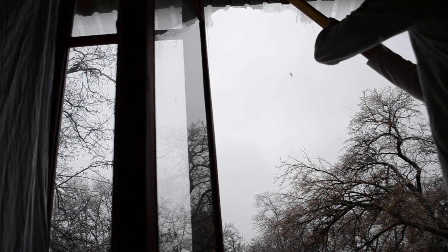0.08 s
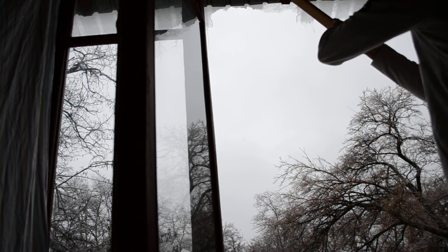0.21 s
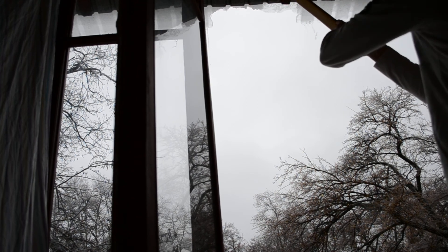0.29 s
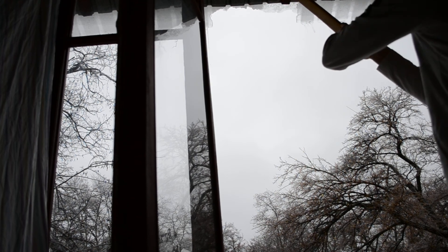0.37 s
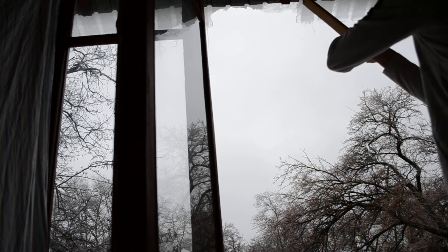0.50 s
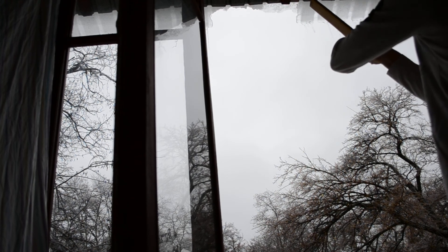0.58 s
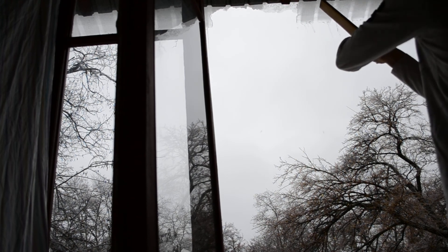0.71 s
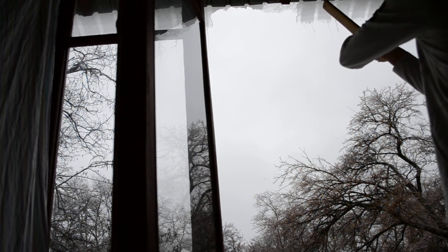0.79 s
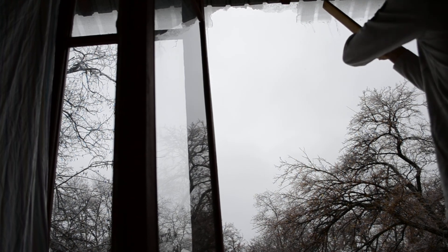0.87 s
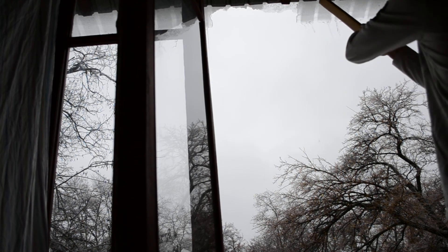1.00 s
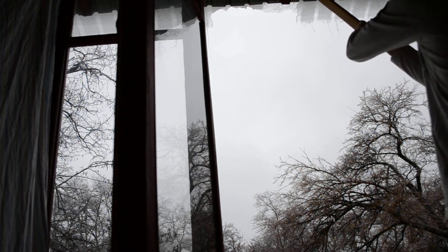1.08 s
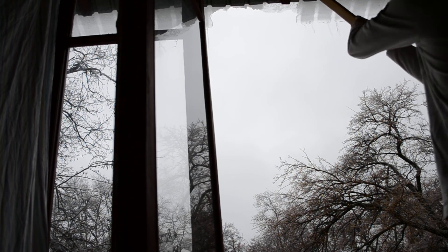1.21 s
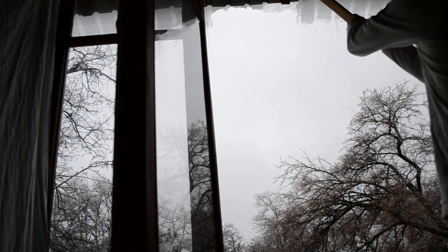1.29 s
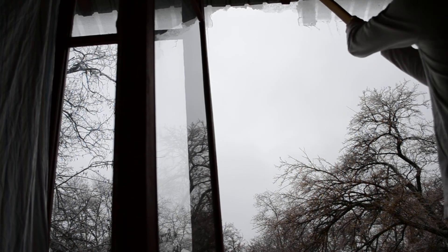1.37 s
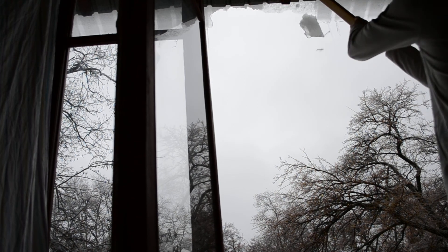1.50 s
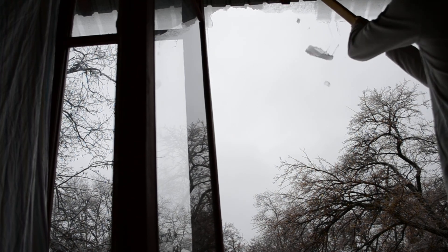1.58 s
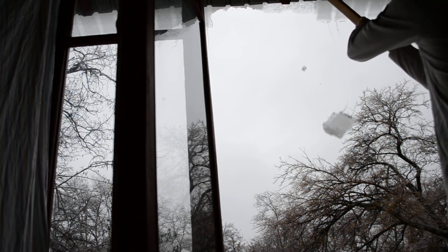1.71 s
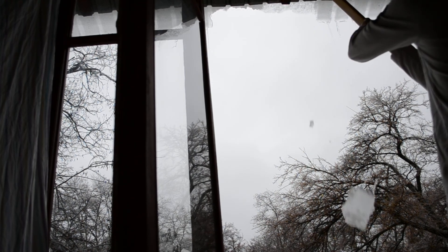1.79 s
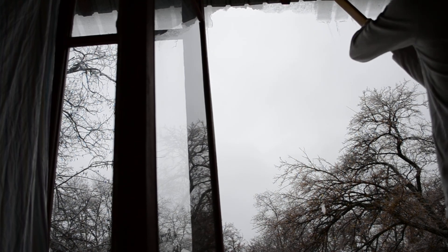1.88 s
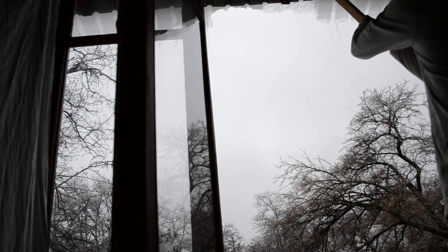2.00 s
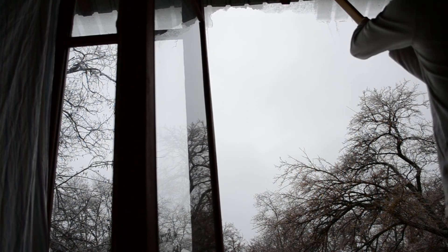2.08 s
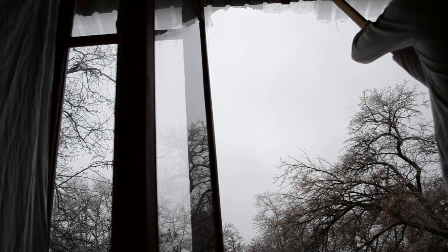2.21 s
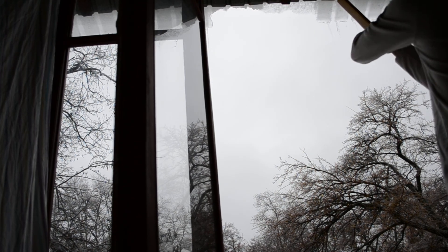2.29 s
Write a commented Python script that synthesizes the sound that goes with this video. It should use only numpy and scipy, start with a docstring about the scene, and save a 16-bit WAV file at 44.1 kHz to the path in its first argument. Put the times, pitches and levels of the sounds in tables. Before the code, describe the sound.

Ice knocked off an eave: sharp shard clicks and a loud lump thud on the sill open, crumbs patter and ice crunches, then softer stick knocks and an icicle snap, close microphone at an open window.

```python
"""Icicles knocked off an eave

A wooden stick, reached out of an open window, knocks on the iced eave, whose modes ring at each blow.
Ice crunches in runs of tiny clicks, an icicle chatters and snaps, and a lump thuds on the ringing sill.
Shards click close by as short rings and noise snaps; crumbs shower down as random clicks and hiss.
Sliding snow, bumping and outdoor air are coloured noise; a tail of noise bands is the room behind."""
import sys
import numpy as np
from scipy import signal
from scipy.fft import rfft, irfft
from scipy.io import wavfile

SR = 44100
rng = np.random.default_rng(int(sys.argv[2]) if len(sys.argv) > 2 else 0)


def put_to_file(sound):
    """Save the sound as 16-bit audio at rate SR, in the file named by the first command-line argument."""
    columns = np.atleast_2d(sound).T  # one column per channel
    safe = np.clip(columns, -1, 1)
    whole_steps = np.round(safe * 32767)
    wavfile.write(sys.argv[1], SR, whole_steps.astype(np.int16))


N = 101430  # 2.3 s
TIME = np.arange(N) / SR
RING_TIME = TIME[:SR // 2]  # half a second for each single sound

# stick strikes the iced eave: t/s, level/dB, treble limit f/Hz, bass limit f/Hz
KNOCKS = [(1.2248, -27, 7800, 150), (1.234, -29.5, 2200, 295), (1.286, -36.5, 2100, 252),
          (1.322, -40.5, 3700, 730), (1.556, -48.5, 2330, 120), (1.9683, -29.5, 3030, 192),
          (1.9775, -32.5, 3250, 127), (1.992, -32.5, 3450, 133), (2.0055, -30.5, 3500, 130),
          (2.1375, -43.5, 5250, 129), (2.1805, -36.5, 960, 510)]
# clear tones of stick and eave: f/Hz, level/dB, time to fall 60 dB t60/s
EAVE_MODES = [(156, -9, .1), (222, -5, .09), (325, -7, .09), (550, -5, .1), (630, -1, .06), (715, 1, .07),
              (872, -7, .09), (958, -6, .11), (1125, -5, .1), (2570, -3, .08), (2665, -1, .07)]
# their crowded lesser modes, as noise bands: f/Hz, level/dB, t60/s
EAVE_RATTLE = [(180, -2, 0.058), (323, -9.5, 0.23), (710, 1.5, 0.068), (1380, -2, 0.13), (2540, -1, 0.13),
               (4560, 1, 0.057), (9400, 6, 0.084)]
# the stick flexes under hard pushes: t/s, level/dB, pitch f/Hz
FLEXES = [(1.226, -37, 233), (1.9719, -24.5, 219), (2.003, -36, 164)]
FLEX_RISE_S = 0.0068

# ice tears loose and crumbles: t/s, length/s, level/dB, centre f/Hz
CRUNCHES = [(0.415, 0.043, -28, 1620), (0.692, 0.039, -21, 1420), (0.724, 0.052, -35.5, 2210),
            (0.828, 0.032, -37.5, 2600), (0.868, 0.044, -34.5, 2980), (1.251, 0.054, -35, 2570),
            (1.986, 0.055, -26, 1480)]
CRUNCH_RISE_SHARE = 0.38  # part of the length spent swelling
CRUNCH_FALL_DB_PER_OCT, CRUNCH_LOW_HZ, FRACTURES_PER_S = 4.5, 250, 5000

# loosened icicle chatters against the stick: t/s, level/dB, treble limit f/Hz, bass limit f/Hz
CHATTER = [(1.3785, -32, 3800, 300), (1.386, -37, 6100, 302), (1.3935, -30, 4900, 302)]
# it snaps off in two quick cracks: t/s, level/dB, treble limit f/Hz, bass limit f/Hz
SNAPS = [(1.4312, -34, 11000, 140), (1.4365, -38, 9400, 201)]
# clear tones of the whole icicle: f/Hz, level/dB, t60/s
ICICLE_MODES = [(535, 1, .075), (850, -2, .07), (1115, -1, .07), (2080, -2, .07), (2600, 2, .06)]
# clear tones of its stump: f/Hz, level/dB, t60/s
STUMP_MODES = [(608, 0, .07), (1450, 3, .08), (2700, 3, .07), (4036, -2, .06), (4510, -4, .05),
               (5022, -1, .06), (6191, -1, .03), (9450, 2, .04)]
# crowded lesser modes of both, as noise bands: f/Hz, level/dB, t60/s
ICICLE_RATTLE = [(330, -9, 0.15), (1000, -3.5, 0.13), (3120, -5.5, 0.15), (7400, 5, 0.049)]

# lump of ice lands on the sill and rocks: t/s, level/dB, treble limit f/Hz, bass limit f/Hz
THUDS = [(.2712, -16.5, 1900, 200), (.278, -16, 3000, 300), (0.2845, -17, 3230, 300)]
# clear tones of the sill: f/Hz, level/dB, t60/s
SILL_MODES = [(288, 2, .08), (466, 0, .1), (617, 5, .085), (748, 1, .08), (830, -3, .06), (918, 3, .1),
              (1030, -11, .12), (1270, -10, .12), (1395, -9, .09), (1527, -11, .12)]
# crowded lesser modes of the sill, as noise bands: f/Hz, level/dB, t60/s
SILL_RATTLE = [(330, -21, 0.12), (760, -8, 0.07), (1480, -10, 0.11), (2920, -3, 0.09), (4830, -9, 0.029)]
SILL_PUNCH_HZ, SILL_PUNCH_DB, SILL_PUNCH_T60_S = 758, 3.5, 0.012

# shards hit sill and frame: t/s, level/dB, pitch f/Hz, t60/s, reflections level/dB
SHARDS = [(.2162, 6, 3120, .008, -21), (.241, -21, 4200, .012, -16), (.3304, -8, 5400, .008, -18),
          (.331, -11, 8600, .014, -20), (.338, -24, 2200, .01, -16), (.3495, -16, 3800, .022, -14),
          (.1375, -29, 7000, .02, -14), (.411, -16, 7300, .009, -26), (.4285, -22, 1500, .025, -16),
          (.4708, -19, 3800, .012, -19), (.5315, -23, 900, .022, -22), (.546, -19, 2900, .015, -19),
          (.5615, -22, 3600, .012, -18), (.5985, -20, 3200, .009, -16), (.9802, -21, 8300, .005, -28),
          (1.0375, -35, 1300, .015, -20), (1.0985, -30, 9300, .006, -24), (1.119, -22, 3000, .007, -24),
          (1.495, -28, 1900, .012, -20), (1.6712, -35, 2400, .012, -22)]
# tones of one shard: multiple of its pitch, level/dB
SHARD_MODES = [(.39, -13), (.65, 0), (1, 3), (1.49, -12), (2.76, -21)]
SHARD_RING_DB, SHARD_SNAP_DB, SNAP_FALL_DB_PER_OCT = -7.5, -6, 10
REFLECTION_DELAY_S, REFLECTION_SWELL_S, REFLECTION_T60_S = 0.0018, 0.005, 0.073

# snow slides down: t/s, level/dB
SNOW_SLIDE = [(2.215, -82), (2.224, -37.5), (2.25, -37), (2.28, -42), (2.3, -46.5)]
# tone colour of the sliding snow: f/Hz, level/dB
SNOW_COLOUR = [(88, -33), (150, -11), (465, 0), (716, -3.5), (2480, 9.5), (2810, 7.5), (4170, 5.5),
               (8870, 11), (11000, 5), (14300, -44), (22000, -120)]

# crumbs showering down: t/s, level/dB
SHOWER = [(0, -35.5), (.05, -44), (.11, -40.5), (.16, -40), (.22, -40.5), (.36, -35), (.48, -40),
          (.62, -38.5), (.78, -42), (.92, -44.5), (1.0, -50), (1.2, -52.5), (1.5, -51), (1.65, -55.5),
          (1.8, -60), (2.3, -54)]
# tone colour of the shower: f/Hz, level/dB
SHOWER_COLOUR = [(59, -58), (100, -18.5), (195, -9), (502, -5), (905, 1), (1770, -5.5), (3100, -4.5),
                 (5200, -10.5), (9040, -6.5), (11000, -13.5), (14300, -42), (22000, -120)]
CRUMBS_PER_S, CRUMB_SPREAD_DB, CRUMB_HISS_SHARE = 1800, 5.5, 0.57  # hiss share is of the power

# dull bumping of movement at the window: t/s, level/dB
BUMPING = [(0, -37.5), (.15, -51.5), (.3, -69), (.8, -87), (1.45, -51.5), (1.582, -46.5), (1.8, -60.5),
           (2.05, -53), (2.2, -35.5), (2.3, -50)]
BUMPING_HZ = 162

# tone colour of the outdoor air: f/Hz, level/dB
AIR_COLOUR = [(25, -23), (160, -28), (235, -12), (456, 5.5), (1030, -11), (1500, 2), (9200, -16),
              (22000, -120)]
AIR_DB = -58
# deep bass outdoors: t/s, level/dB
RUMBLE = [(0, -63), (.25, -60), (.33, -74), (1.2, -72), (1.3, -63), (1.9, -76), (2.0, -57), (2.1, -66)]
RUMBLE_HZ = 43

# bands of the room's tail: f/Hz, level/dB, t60/s
ROOM = [(151, -29.5, 0.48), (362, -23, 0.44), (884, -22.5, 0.26), (2480, -20.5, 0.55), (8050, -23, 0.51)]

MIC_DIP_HZ, MIC_DIP_Q, MIC_TOP_HZ, CUTOFF_HZ = 7660, 15, 10320, 12236
OVERLOAD = 0.61  # size that the wave can approach but not pass


def from_db(db):
    """Turn decibels into a gain."""
    return 10 ** (np.asarray(db) / 20)


def rms_one(x):
    """Scale to an average strength (rms) of 1."""
    return x / np.sqrt(np.mean(x ** 2) + 1e-20)


def dying(t60):
    """Smooth decay that falls by 60 dB in t60 seconds."""
    return np.exp(-np.log(1000) * RING_TIME / t60)


def tone(hz):
    """Steady sine wave, half a second long."""
    return np.sin(2 * np.pi * hz * RING_TIME)


def level(curve):
    """Gain over time from points of t/s and level/dB."""
    return from_db(np.interp(TIME, *np.transpose(curve)))


def add(out, s, x):
    """Mix x into out from time s."""
    i = max(int(s * SR), 0)
    out[i:i + len(x)] += x[:max(N - i, 0)]


def cut(x, hz, kind, order=2):
    """Weaken what lies above ("low") or below ("high") a frequency."""
    return signal.sosfilt(signal.butter(order, hz, kind, fs=SR, output="sos"), x)


def shaped(x, gain_at):
    """Colour a steady signal by a gain over octaves (log2 of Hz), then scale to rms 1."""
    octave = np.log2(np.fft.rfftfreq(len(x), 1 / SR) + 1)
    return rms_one(irfft(rfft(x) * gain_at(octave), len(x)))


def coloured(x, spectrum):
    """Colour by points of f/Hz and level/dB."""
    hz, db = np.transpose(spectrum)
    return shaped(x, lambda octave: from_db(np.interp(octave, np.log2(hz), db)))


def humped(x, hz, fall_db):
    """Colour by one rounded hump that falls off by about fall_db per octave on both sides."""
    return shaped(x, lambda octave: from_db(-fall_db * np.hypot(octave - np.log2(hz), .5)))


def grains(per_s, spread_db, size):
    """Clicks at random moments; a larger spread makes their strengths more uneven."""
    strength = from_db(spread_db * np.minimum(rng.exponential(1, size), 5))
    sign = rng.choice([-1, 1], size)
    happens = rng.random(size) < per_s / SR
    return rms_one(strength * sign * happens)


def dense_ring(bands):
    """Crowded modes blur into overlapping noise bands, each dying at its own rate."""
    centres = np.log2([row[0] for row in bands])
    edges = np.r_[centres[0] - 1, centres, centres[-1] + 1]
    rings = []
    for k, (hz, db, t60) in enumerate(bands):
        noise = rng.standard_normal(len(RING_TIME))
        # a triangle in power, reaching to the neighbouring centres
        band = shaped(noise, lambda octave: np.sqrt(np.interp(octave, edges[k:k + 3], [0, 1, 0])))
        rings.append(from_db(db) * dying(t60) * band)
    return rings


def struck(blows, modes, rattle, vary_db):
    """Each blow rings a body's modes, with varied strengths and its own treble and bass limits."""
    out = np.zeros(N)
    for s, db, treble_hz, bass_hz in blows:
        ring = np.zeros(len(RING_TIME))
        for k, (hz, mode_db, t60) in enumerate(modes):
            strength = from_db(mode_db + vary_db * rng.standard_normal())
            ring += (-1) ** k * strength * dying(t60) * tone(hz)
        ring += sum(dense_ring(rattle))
        softened = cut(ring, treble_hz, "low")
        add(out, s, from_db(db) * cut(softened, bass_hz, "high", order=4))
    return out


def knocks():
    """The stick's blows set the modes of stick and eave ringing."""
    return struck(KNOCKS, EAVE_MODES, EAVE_RATTLE, vary_db=2.5)


def flexing():
    """A hard push bends the stick, which answers with a low swing that swells and dies."""
    out = np.zeros(N)
    for s, db, hz in FLEXES:
        age = RING_TIME / FLEX_RISE_S
        swell = age * np.exp(1 - age)
        add(out, s, from_db(db) * swell * tone(hz))
    return out


def crunches():
    """Ice gives way in runs of tiny fractures that swell and die away."""
    out = np.zeros(N)
    for s, length, db, hz in CRUNCHES:
        clicks = grains(FRACTURES_PER_S, spread_db=0, size=len(RING_TIME))
        fractures = humped(clicks, hz, CRUNCH_FALL_DB_PER_OCT)
        fractures = cut(fractures, CRUNCH_LOW_HZ, "high", order=4)
        fractures = cut(fractures, 5850, "low", order=1)
        swell = np.interp(RING_TIME / length, [0, CRUNCH_RISE_SHARE, 1], [0, 1, 0]) ** 0.85
        add(out, s, from_db(db) * swell * fractures)
    return out


def icicle():
    """The hanging icicle chatters, then snaps; its shorter stump rings higher."""
    chatter = struck(CHATTER, ICICLE_MODES, ICICLE_RATTLE, vary_db=-1)  # the sign only mirrors the draws
    snaps = struck(SNAPS, STUMP_MODES, ICICLE_RATTLE, vary_db=3)
    return chatter + snaps


def lump():
    """A heavy piece punches the sill and sets it ringing, then rattles as it rocks."""
    landing = struck(THUDS[:1], SILL_MODES, SILL_RATTLE, vary_db=6.5)
    rocking = struck(THUDS[1:], [], SILL_RATTLE, vary_db=0)
    out = landing + rocking
    punch = cut(dying(SILL_PUNCH_T60_S) * tone(SILL_PUNCH_HZ), 360, "high", order=3)
    add(out, THUDS[0][0], from_db(SILL_PUNCH_DB) * punch)
    return out


def shards():
    """Each shard snaps and rings for a few milliseconds; the window recess scatters it back."""
    out = np.zeros(N)
    gathering = np.minimum(RING_TIME / REFLECTION_SWELL_S, 1)
    for s, db, pitch_hz, t60, reflected_db in SHARDS:
        ring = sum(from_db(mode_db) * tone(ratio * pitch_hz)
                   for ratio, mode_db in SHARD_MODES if ratio * pitch_hz < SR / 2)
        snap_noise, scatter_noise = rng.standard_normal((2, len(RING_TIME)))
        snap = humped(snap_noise, .75 * pitch_hz, SNAP_FALL_DB_PER_OCT)
        direct = from_db(SHARD_RING_DB) * ring + from_db(SHARD_SNAP_DB) * snap
        add(out, s, from_db(db) * cut(direct * dying(t60), 784, "high"))
        scatter = humped(scatter_noise, .8 * pitch_hz, fall_db=23)
        reflection = gathering * dying(REFLECTION_T60_S) * scatter
        add(out, s + REFLECTION_DELAY_S, from_db(db + reflected_db) * reflection)
    return out


def snow_slide():
    """Sliding snow makes a dense run of fine, bright clicks."""
    sliding = coloured(grains(per_s=7500, spread_db=3, size=N), SNOW_COLOUR)
    started = TIME > SNOW_SLIDE[0][0]
    return level(SNOW_SLIDE) * started * sliding


def shower():
    """Crumbs patter down: near ones tick, far ones merge into a hiss."""
    ticks = grains(CRUMBS_PER_S, CRUMB_SPREAD_DB, size=N)
    hiss = rng.standard_normal(N)
    patter = np.sqrt(1 - CRUMB_HISS_SHARE) * ticks + np.sqrt(CRUMB_HISS_SHARE) * hiss
    return level(SHOWER) * coloured(patter, SHOWER_COLOUR)


def bumping():
    """Movement at the window makes soft, lumpy noise in the low range."""
    lumps = humped(grains(per_s=1300, spread_db=2.5, size=N), BUMPING_HZ, fall_db=2)
    lumps = cut(lumps, 110, "high", order=4)
    return level(BUMPING) * cut(lumps, 700, "low")


def air():
    """Faint outdoor noise with a deep rumble that comes and goes."""
    hush, rumble = rng.standard_normal((2, N))
    hush = from_db(AIR_DB) * coloured(hush, AIR_COLOUR)
    return hush + level(RUMBLE) * humped(rumble, RUMBLE_HZ, fall_db=29)


def room(x):
    """The room behind the window answers with a blurred tail, each band dying at its own rate."""
    # dividing by the size of the decay evens out long and short bands, apart from their levels
    tail = sum(band / np.linalg.norm(dying(t60)) for band, (_, _, t60) in zip(dense_ring(ROOM), ROOM))
    build_up = 1 - dying(t60=0.048)
    return signal.fftconvolve(x, tail * build_up)[:N]


def scene():
    """Blows, falling ice and sliding snow, over the shower of crumbs and the outdoor air."""
    blows = knocks() + crunches()
    near = lump() + shards() + icicle() + flexing()
    ringing_room = room(blows + from_db(-9.5) * near)  # near sounds send less into the room
    background = shower() + snow_slide() + bumping() + air()
    return (blows + near + ringing_room + background)[None]


def record(dry):
    """A small microphone with a narrow treble dip and a dull top; the loudest hits overload it."""
    x = signal.lfilter(*signal.iirnotch(MIC_DIP_HZ, MIC_DIP_Q, fs=SR), dry)
    x = cut(x, MIC_TOP_HZ, "low", order=14)
    x = x / (1 + (x / OVERLOAD) ** 6) ** (1 / 6)  # rounds off the highest peaks
    return cut(x, CUTOFF_HZ, "low", order=10)


dry = scene()
out = record(dry)
put_to_file(out)
```